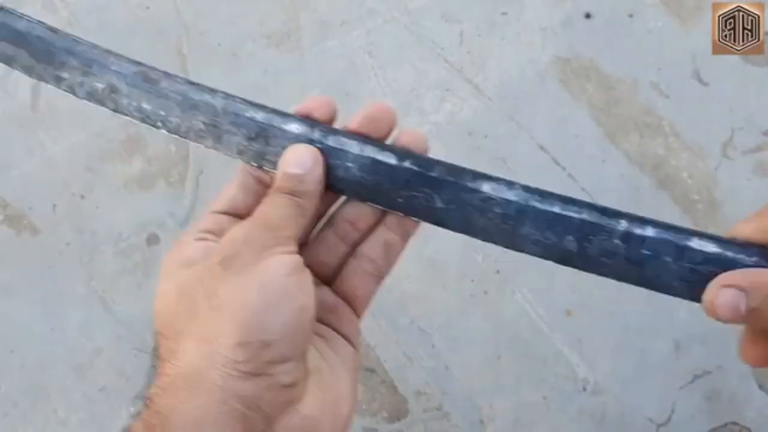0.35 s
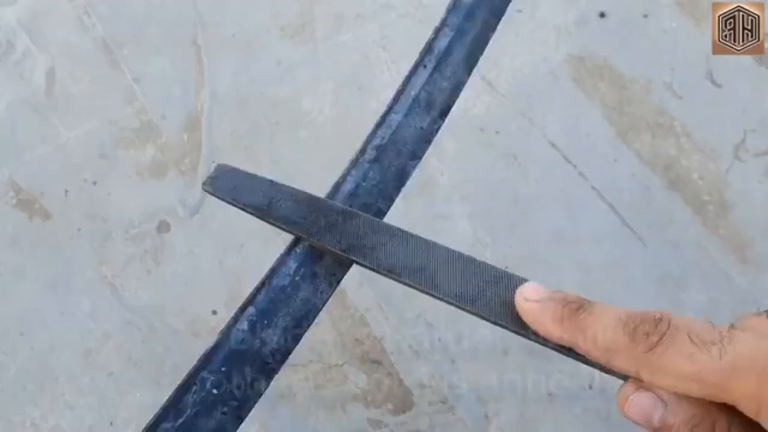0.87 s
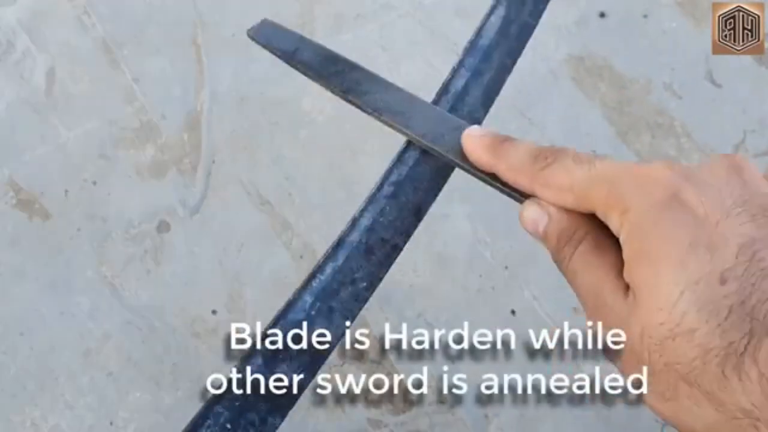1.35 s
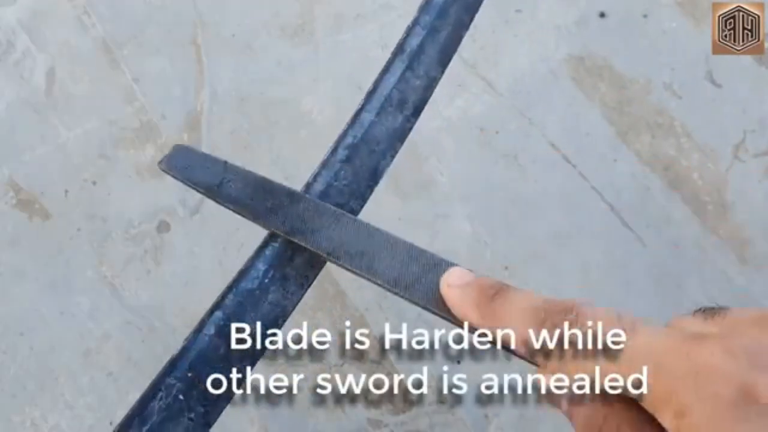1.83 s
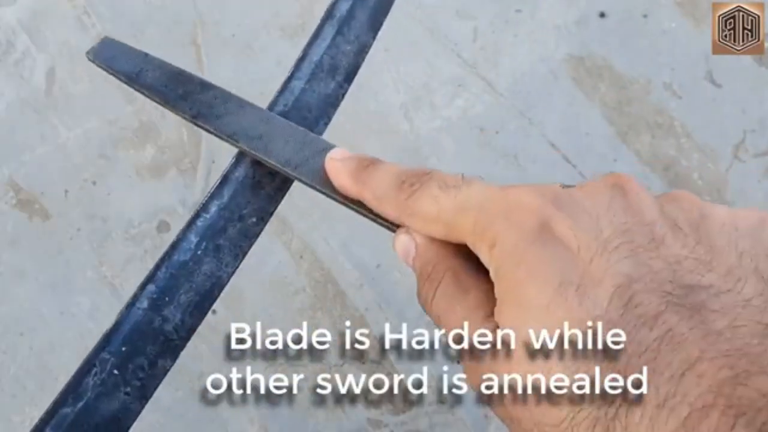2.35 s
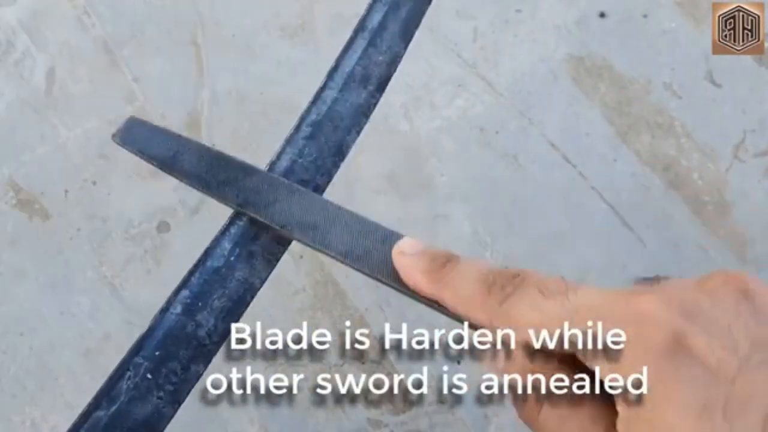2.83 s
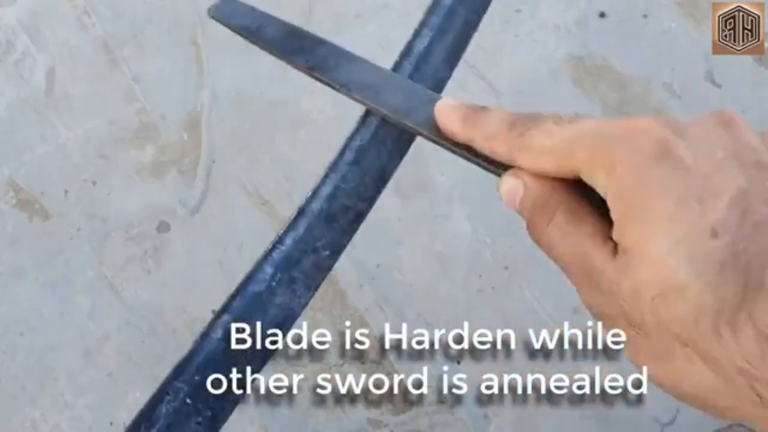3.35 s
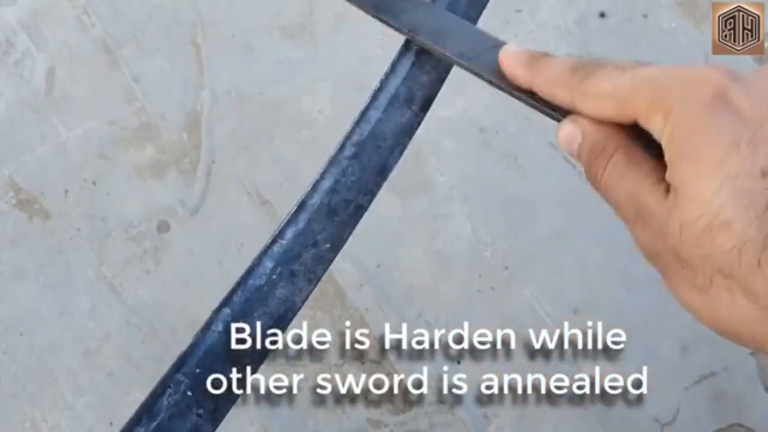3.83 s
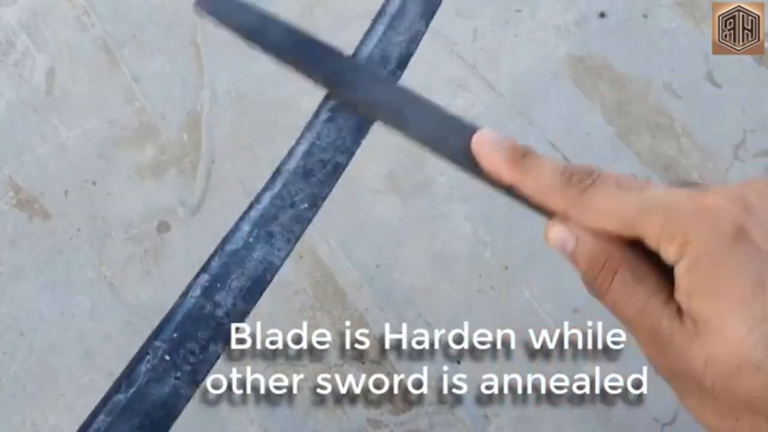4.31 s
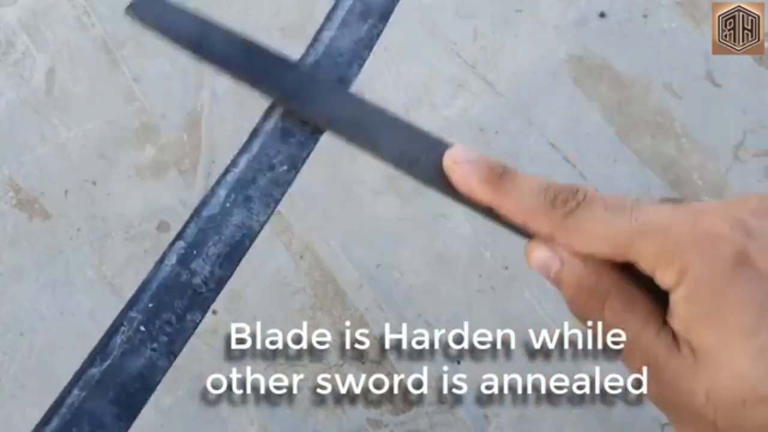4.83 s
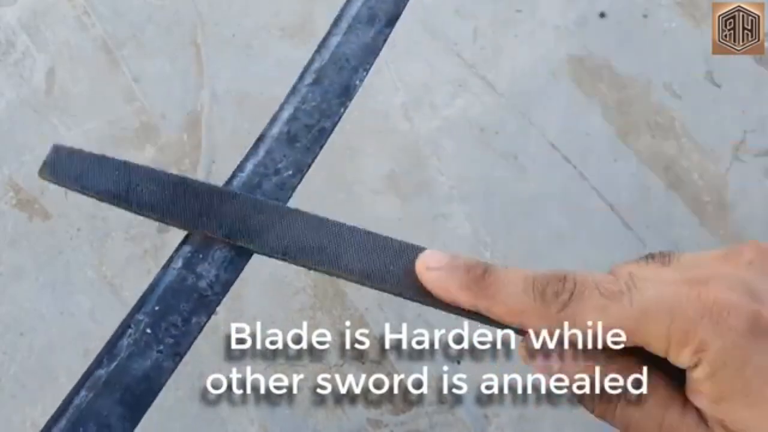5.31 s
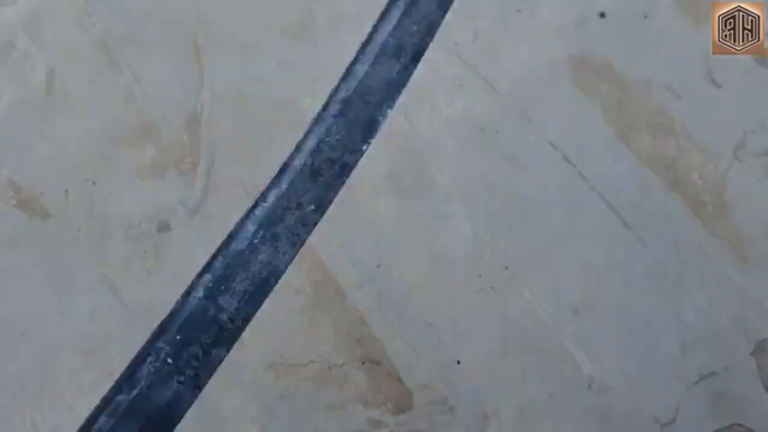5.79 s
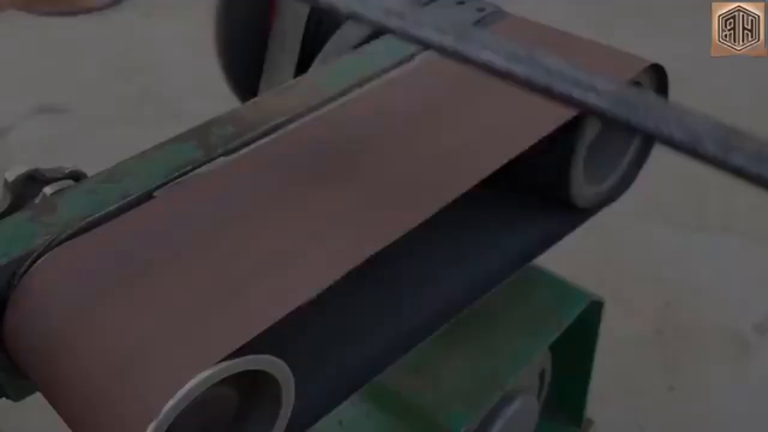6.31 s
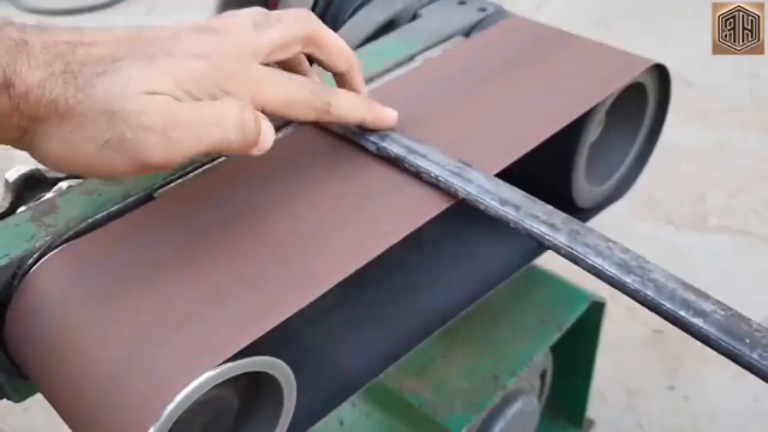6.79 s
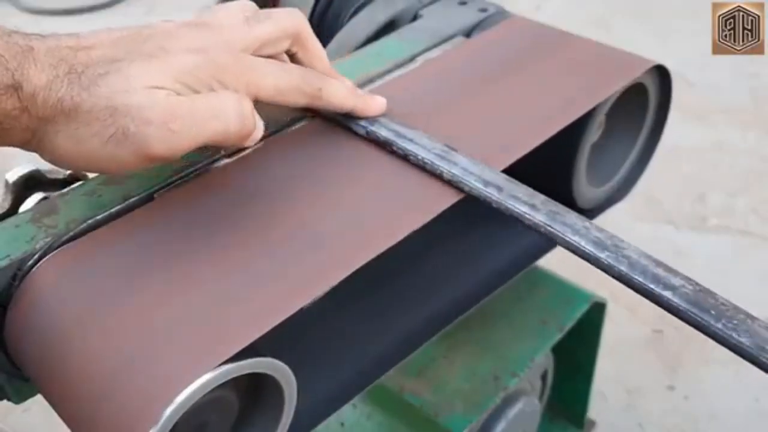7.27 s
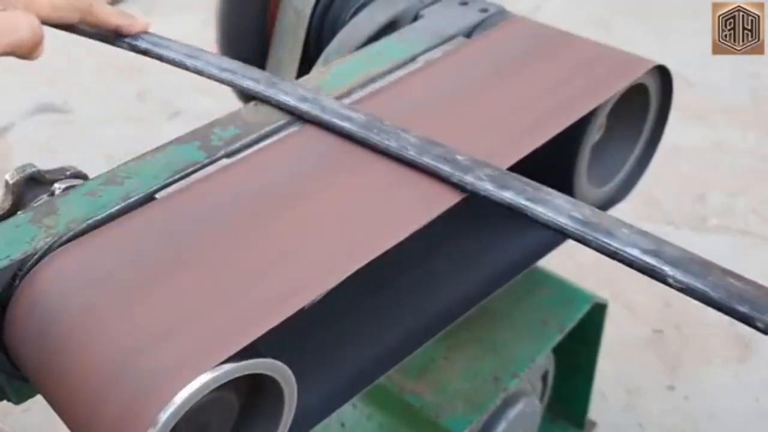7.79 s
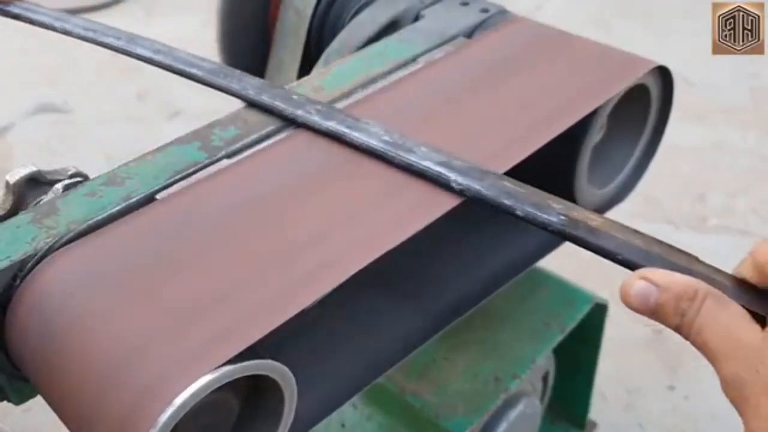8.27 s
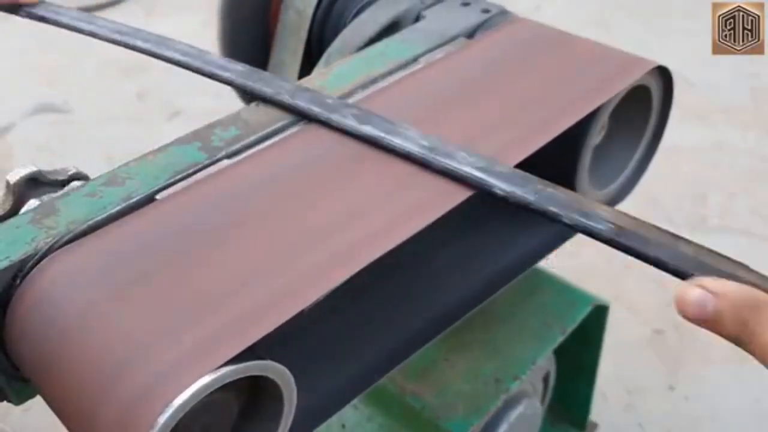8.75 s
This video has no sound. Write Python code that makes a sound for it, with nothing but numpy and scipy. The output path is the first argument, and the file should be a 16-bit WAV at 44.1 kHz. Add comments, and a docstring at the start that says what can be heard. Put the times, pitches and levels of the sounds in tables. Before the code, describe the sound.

A phone close to the work outdoors hears soft wind buffets and distant yard noise. A hand file clicks onto a hardened blade and skates over it in bright, glassy, uneven strokes with quiet gaps. Suddenly a belt grinder replaces the open air, humming and growling alone, then the blade presses on and a strong sandy hiss appears, with steel singing thinly. Treble leans left.

```python
"""Outdoors, a hand file taps a hardened steel blade and skates across it in short strokes, over wind and yard noise.
At about 6.25 s the outdoor sound stops and a belt grinder is heard, running free at first;
then the blade is pressed on its belt, and hisses and sings.
File and blade are noise chopped by teeth and passed through resonances; wind, yard and belt are coloured noise.
A phone with two microphone ports listens; the left port faces the work and hears more treble."""
import sys
import numpy as np
from scipy import signal
from scipy.fft import rfft, irfft
from scipy.io import wavfile
from scipy.ndimage import uniform_filter1d, map_coordinates

SR = 44100
rng = np.random.default_rng(int(sys.argv[2]) if len(sys.argv) > 2 else 0)


def file_out(sig):
    """Save sig as 16-bit WAV at sys.argv[1]."""
    # one column per channel
    cols = np.atleast_2d(sig).T
    # limit, then scale
    lim = np.clip(cols, -1, 1)
    pcm = np.round(lim * 32767).astype(np.int16)
    wavfile.write(sys.argv[1], SR, pcm)


def field_ratio(decibels):
    """Amplitude ratio for a level in dB (20 dB per decade); scalars and array-likes work."""
    return 10 ** (np.asarray(decibels, dtype=float) / 20)


N = 403074
TIME = np.arange(N) / SR

# Levels in the tables are relative: the functions below add their own gains.
# Tone of the yard noise. Each row: pitch in Hz, level in dB per Hz.
YARD_TONE = [(150, -11.5), (220, -9), (450, -14), (700, -12.5), (1360, -27), (2300, -22), (3600, -32),
             (6000, -38)]
# Borders of the yard bands that swell separately, in Hz.
YARD_EDGES_HZ = [150, 280, 500, 800, 1300, 1900, 2800, 7000]
# Loudness of the yard. Each row: time in seconds, level in dB.
YARD_LEVEL = [(0, -62), (.3, -60), (.85, -59.5), (.95, -66), (6.3, -69)]
# Tone of the wind. Each row: pitch in Hz, level in dB per Hz.
WIND_TONE = [(12, -48), (20, -8), (50, 2.5), (86, 2.5), (172, 0), (239, -20.5), (300, -22.5), (390, -51.5),
             (660, -120)]
# Wind at the two ports. Each row: pitch in Hz, left minus right in dB.
WIND_PAN = [(25, 11), (60, 3), (120, 3)]
# Gusts on the ports. Each row: middle in seconds, half length in seconds, peak in dB.
GUSTS = [(0.0, 0.031, -47), (0.38, 0.17, -52.5), (0.717, 0.11, -50.5), (1.803, 0.086, -64),
         (2.14, 0.049, -53), (2.72, 0.17, -62), (3.301, 0.086, -53.5), (3.66, 0.14, -51),
         (4.163, 0.15, -58.5), (6.158, 0.17, -49.5)]
CALM_DB = -64  # wind between gusts
# Tone of the faint hiss. Each row: pitch in Hz, level in dB per Hz.
HISS_TONE = [(1500, -51), (2400, -23.5), (4000, -21.5), (6500, -5), (8000, -4), (13000, -3), (15500, 4)]
# When the faint hiss is heard; the one at 2.723 s is a light drag of the file.
# Each row: start in seconds, length in seconds, level in dB, change in dB.
HISS_TIMES = [(0.0, 0.4, -62, 7.5), (0.496, 0.26, -61.5, 7), (2.27, 0.15, -67.5, -4),
              (2.723, 0.078, -49.5, -24), (3.087, 0.19, -70.5, 4), (3.988, 0.27, -63.5, 6),
              (5.894, 0.31, -60.5, 6)]
SOFT_S = 0.048  # these sounds come and go gently
MACHINE_FROM_S = 6.25  # the outdoor sound ends here

# Loudness of the machine. Each row: time in seconds, level in dB.
MACHINE_LEVEL = [(6.24, -68), (6.26, -33.5), (6.39, -31.5), (6.48, -31), (7.9, -29), (8.01, -29.5),
                 (8.12, -29), (9.14, -25)]
# Tone of the running belt. Each row: pitch in Hz, level in dB per Hz.
BELT_TONE = [(18, -63.5), (30, -27.5), (237, -25), (284, -23), (639, -15.5), (1230, -12.5), (1770, -10.5),
             (3680, -10), (6050, -26), (13300, -32), (15500, -22.5)]
# Resonances of the machine frame. Each row: pitch in Hz, width in Hz before widening, level in dB.
FRAME_MODES = [(223, 3.1, -3), (256, 15.4, -1), (437, 9, -6), (479, 120, -7), (577, 60, -13.5),
               (834.5, 27, 3.5), (2540, 27, -13.5)]
# Ring of the frame. Each row: time in seconds, level in dB.
FRAME_LEVEL = [(6.25, -14), (6.45, -2.5), (6.7, -2), (7.3, -7.5), (7.8, -9), (8.4, -9), (8.6, -16),
               (9.14, -12)]
# Resonances of the growl. Each row: pitch in Hz, width in Hz before widening, level in dB.
GROWL_MODES = [(998, 77, -4.5), (1166, 13, 3), (1208, 16, 6.5), (1248, 10, 4), (1354, 50, -2.5),
               (1360, 120, -18.5)]
# Growl, damped once the blade loads the belt. Each row: time in seconds, level in dB.
GROWL_LEVEL = [(6.25, -4), (6.4, 10), (6.6, 3.5), (6.9, 5.5), (7.05, 2.5), (7.3, -7), (9.14, -11.5)]
# Brief booms of the frame. Each row: middle in seconds, peak in dB.
BOOMS = [(7.64, -43), (7.77, -42.5), (7.88, -38), (8.15, -47.5), (8.28, -43.5), (8.92, -49)]
SHAFT_HZ, BOOM_HALF_S = 23.8, 0.042
# Bounces off the machine, moving with the blade. Each row: time in seconds, delay off the table in ms,
# delay off the platen (plate behind the belt) in ms, share off the platen from 0 to 1.
BOUNCES = [(7.002, 0.85, 0.364, 0.2), (7.5, 0.7, 0.363, 0.21), (7.9, .73, 0.305, 0.2),
           (8.2, 0.67, 0.376, 0.5), (8.55, .63, 0.36, 0.2), (8.85, .6, 0.338, 0.5), (9.05, .65, 0.42, 0.02)]
BLADE_ON_S = 7.05  # bounces are heard from here
# Tone of the belt's hiss. Each row: pitch in Hz, level in dB per Hz.
BELT_HISS_TONE = [(900, -32), (1800, -9), (3500, -3), (5500, 2), (8000, -2), (10500, -9), (13000, -7),
                  (15500, -10)]
# Hiss of the belt, running free at first, then with steel pressed on it.
# Each row: time in seconds, treble in dB, middle against the treble in dB.
BELT_HISS_LEVEL = [(6.24, -79.5, -5), (6.26, -54, -6), (6.42, -47.5, 0), (6.99, -46, -4.5),
                   (7.13, -29, -10.5), (7.62, -33.5, -9), (7.85, -32.5, -6), (8.02, -38, -6),
                   (8.12, -33, -9), (8.74, -28.5, -21.5), (9.04, -33, -4.5), (9.11, -38.5, 11.5),
                   (9.14, -40.5, 12)]
# Resonances of the blade on the belt. Each row: pitch in Hz, width in Hz, level in dB.
BLADE_MODES = [(1855, 95, -3), (3855, 46, 0), (4540, 70, -15), (6460, 110, -3), (7940, 80, -15)]
# When the blade sings. Each row: start in seconds, length in seconds, level in dB, change in dB,
# lowest mode in dB, upper modes in dB.
SONGS = [(7.327, 0.656, -34.5, 2, -39, 0), (8.032, 1.015, -43, 14.5, -5.5, -0.5)]
# Hiss and song at the two ports. Each row: pitch in Hz, left minus right in dB.
GRIND_PAN = [(700, 5), (1300, -9), (2400, 16), (4400, 5.5), (8100, 6.5), (15000, 18)]

# Strokes of the file, and one very short catch at 4.436 s. Each row: fastest moment in seconds,
# speeding up in seconds, slowing down in seconds, level in dB, middle ring in dB, treble in dB.
STROKES_AND_CATCH = [(1.375, 0.089, 0.14, -22, -14, 15.5), (1.96, .04, .042, -36, -12, 16),
                     (2.152, 0.079, 0.061, -23.5, 1.5, 14.5), (2.608, .036, 0.063, -33.5, 5.5, 10),
                     (2.956, .07, 0.1298, -35.5, -9, 12), (3.3, 0.06, 0.1264, -24, -14.5, 14),
                     (3.851, 0.1125, 0.18, -26.5, -1, 12.5), (4.401, 0.075, 0.23, -23, 6, 9),
                     (4.436, 0.0073, 0.01, -26.5, 11.5, 9.5), (4.59, 0.14, 0.057, -29.5, 8, 8.5),
                     (4.954, 0.059, 0.18, -22, 1.5, 11.5), (5.173, 0.19, .075, -26, 10, 5),
                     (5.542, 0.085, .05, -23.5, 5, 9), (5.595, 0.048, 0.041, -37.5, 0, 8),
                     (5.785, .055, 0.11, -19, -0.5, 13)]
RISE_POWER, FALL_POWER = 1.83, 3.4  # level grows as speed to this power
# Light drags. Each row: start in seconds, length in seconds, level in dB, change along the drag in dB,
# middle ring in dB, treble in dB.
DRAGS = [(0.951, 0.056, -45, -5.5, -1, 7), (1.854, .08, -45, -9.5, -15, 3),
         (2.703, 0.065, -60, -0.5, 7, -5), (2.807, 0.063, -41, -10, 0.5, 2), (3.432, .06, -53, -5, 1, 5.5),
         (3.526, 0.052, -46.5, -4, -1, 3), (3.609, .15, -49, 0.5, -22, -9.5),
         (4.176, 0.14, -64.5, 21, -12, -22), (4.843, 0.051, -42, -6.5, -8, -12.5),
         (5.428, 0.054, -46.5, 7.5, 5, 1.5), (5.689, 0.023, -61, -1.5, 2.5, 3.5)]
DRAG_ATTACK_S = 0.0041
LET_GO_DB_PER_S = 602  # fall at the end of drags, hisses and songs
# File lands on the blade. Each row: time in seconds, force in dB, middle ring in dB.
TAPS = [(0.9427, -14.5, 6), (1.2544, -42, -16), (1.33, -30.5, -4.5), (1.846, -28.5, -4), (1.946, -23.5, -4),
        (2.0883, -23, 0.5), (2.154, -21, -4.5), (2.5882, -22, 4), (2.807, -27.5, -3), (3.488, -29.5, -8),
        (3.5207, -19.5, 12), (3.5385, -26, 4), (3.5487, -28, 2), (3.5615, -20, 1), (3.5964, -21.5, -5),
        (3.637, -27, -6), (3.7195, -29.5, -4), (3.770, -16.5, -7), (4.243, -20, 13.5), (4.8468, -12, 8),
        (4.889, -30, -5), (5.4218, -7, -10)]
CLICK_GROWTH, CLICK_DB = 1.4, 4  # soft landings hardly click
RATTLE_DB, RATTLE_S = -15.5, 0.005
TAP_TREBLE_DB, TAP_BASS_DB = 8.5, 11.5  # a landing knocks deeper than a scrape
TOOTH_HZ, TOOTH_GATE = 924.4, 0.5  # teeth passing at full speed; how far they chop the scrape
# Buzz of the teeth, lost once the file skates. Each row: time in seconds, level in dB.
TOOTH_LEVEL = [(1.5, -3), (2.0, -14), (2.15, -5), (2.5, -14), (3.3, -13), (3.6, -26)]
TAIL_DB, TAIL_S = -24.5, 0.033  # the steel hums on after each stroke
# Broad tone of the scrape. Each row: pitch in Hz, level in dB per Hz.
SCRAPE_TONE = [(300, -32.5), (520, -13.5), (900, -3), (1500, 0), (2800, 9.5), (4300, 5), (7000, 0),
               (12000, -8.5), (15000, -6.5)]
# File and blade ring together. Each row: pitch in Hz, width in Hz before widening, level in dB.
FILE_MODES = [(2420, 80, -5), (2530, 80, -4), (2810, 77, -7), (3260, 90, -1), (3460, 70, 0), (3620, 80, -2),
              (4510, 65, -5), (5140, 90, -2), (5900, 80, -4), (6560, 70, -4), (7380, 80, -6),
              (7900, 55, -6), (8950, 70, -6), (9950, 60, -6), (10800, 90, -11), (11800, 100, -12),
              (12750, 100, -12), (13700, 110, -12), (14750, 120, -14)]
# Bass against the low ring; later strokes are thinner. Each row: time in seconds, level in dB.
BASS_LEVEL = [(1.0, -13.5), (1.4, -15), (2.15, -8), (3.3, -6.5), (3.8, -16), (4.4, -15), (5.8, -18)]
BASS_PER_FORCE = 0.37  # dB per dB: firm pressure brings out the bass
LOW_DB, LOW_PER_FORCE = -8, 0.026  # band under the low ring, fuller with pressure
SLIDE_MS = 0.3  # the modes drift in pitch as the contact slides along
# File at the two ports. Each row: pitch in Hz, left minus right in dB.
FILE_PAN = [(700, -4), (1300, 4), (2400, 3.5), (4400, 3), (8100, 10), (15000, 1)]
FILE_LEAN_DB = -0.5  # left minus right, at all pitches
TOP_HZ = 15050  # the phone's upper limit


def unit(x):
    """Scale to an average strength (rms) of 1."""
    return x / np.sqrt(np.mean(x ** 2))


def curve(rows):
    """Read a two-column table at every sample, holding its end values."""
    return np.interp(TIME, *np.transpose(rows))


def curves(rows, outside=-120):
    """Columns of a table at every sample; practically silent outside its span."""
    s, *columns = np.transpose(rows)
    return [np.interp(TIME, s, c, outside, outside) for c in columns]


def walk(rate):
    """Random levels held 1 / rate s and slewed; spread near 1."""
    k = max(int(SR / rate), 1)
    steps = np.repeat(rng.standard_normal(N // k + 1), k)[:N]
    return 1.2 * uniform_filter1d(steps, k)


def held(start, length, db, change_db):
    """Gain that sets in at once, drifts by change_db and then lets go."""
    t = TIME - start
    drift_db = change_db * np.clip(t / length, 0, 1)
    return (t > 0) * field_ratio(db + drift_db - LET_GO_DB_PER_S * np.clip(t - length, 0, 1))


def bumps(rows):
    """Add up bell-shaped swells, each given as middle, half length and peak dB."""
    return sum(field_ratio(db) * np.exp(-((TIME - s) / half) ** 2) for s, half, db in rows)


def colour(x, points):
    """Shape the tone through (Hz, dB) points without sounding early, by folding the cepstrum."""
    hz, db = np.transpose(points)
    grid_hz = np.linspace(1, SR / 2, num=2049)
    cep = irfft(np.interp(np.log(grid_hz), np.log(hz), db) * np.log(10) / 20)
    cep[1:2048] *= 2
    cep[2049:] = 0
    return signal.oaconvolve(x, irfft(np.exp(rfft(cep)))[None], axes=1)[:, :N]


def band(x, lo_hz, hi_hz):
    """Band-pass without phase shift, so that neighbouring bands join smoothly."""
    return signal.sosfiltfilt(signal.butter(2, [lo_hz, hi_hz], "band", fs=SR, output="sos"), x)


def delay(x, ms):
    """Read each channel at a moving, interpolated lag."""
    place = np.arange(N) - ms * SR / 1000
    return np.array([map_coordinates(v, [place], order=3) for v in x])


def ports(alike_hz):
    """Noise for two ports: alike well below alike_hz, unrelated well above."""
    left, other = rng.standard_normal((2, N))
    low, high = (signal.butter(1, alike_hz, kind, fs=SR) for kind in ("low", "high"))
    return np.array([left, signal.lfilter(*low, left) + signal.lfilter(*high, other)])


def lean(x, pan):
    """Share each band's left-minus-right difference evenly between the two ports."""
    left = colour(x[:1], [(hz, db / 2) for hz, db in pan])
    right = colour(x[1:], [(hz, -db / 2) for hz, db in pan])
    return np.vstack([left, right])


def ring(x, modes, widen, waver_db, rate):
    """Add resonances; each swells and fades, partly differently at each port."""
    total = 0
    for hz, width, db in modes:
        waver = 1.09 * walk(rate) + 0.63 * np.array([walk(rate), walk(rate)])
        tone = signal.lfilter(*signal.iirpeak(hz, hz / (widen * width), SR), x)
        total = total + field_ratio(db + waver_db * waver) * tone
    return total


def yard():
    """Distant yard noise; each band swells on its own."""
    noise = unit(colour(ports(350), YARD_TONE))
    bands = sum(band(noise, lo, hi) * field_ratio(4.3 * walk(7)) for lo, hi in zip(YARD_EDGES_HZ, YARD_EDGES_HZ[1:]))
    return bands * field_ratio(curve(YARD_LEVEL))


def wind():
    """Gusts buffet the ports as deep noise, stronger at the left one."""
    gusts = (field_ratio(CALM_DB) + bumps(GUSTS)) * field_ratio(3.0 * walk(12))
    noise = ports(51)[::-1] + 0.9 * ports(900)
    return lean(unit(colour(noise, WIND_TONE)), WIND_PAN) * gusts


def faint_hiss_and_drag():
    """Wavering high noise, stronger at the left port, makes the faint hiss and one light drag of the file."""
    hiss = unit(colour(ports(1500), HISS_TONE)) * field_ratio(3.3 * walk(6.5)) * field_ratio(np.array([[3.5], [-3.0]]))
    return hiss * uniform_filter1d(sum(held(*row) for row in HISS_TIMES), int(SOFT_S * SR))


def outdoors():
    """Wind, yard noise, faint hiss and one light drag are added up and stop where the machine comes in."""
    return (wind() + yard() + faint_hiss_and_drag()) * (TIME < MACHINE_FROM_S)


def running_machine(shake):
    """Belt and bearings shake the frame, which hums and growls on its resonances."""
    belt = unit(colour(shake, BELT_TONE))
    hum = unit(ring(shake, FRAME_MODES, widen=0.95, waver_db=2.1, rate=12))
    growl = unit(ring(shake, GROWL_MODES, widen=1.38, waver_db=1.7, rate=24))
    growl_db = curve(GROWL_LEVEL) + 1.8 * walk(48)
    return belt + field_ratio(curve(FRAME_LEVEL)) * hum + field_ratio(growl_db) * growl


def frame_booms(shake):
    """The frame booms briefly, as swells of the shaking in one low band."""
    swells = bumps([(s, BOOM_HALF_S, db) for s, db in BOOMS])
    return swells * unit(band(shake, 393, 580))


def belt_hiss(rough, table_ms, platen_ms, share):
    """The belt hisses, free at first, then on the steel, where two bounces with moving delays comb the hiss."""
    table = [[0.3], [0.15]] * (TIME > BLADE_ON_S) * band(delay(rough, table_ms), 7000, 19000)
    hiss = colour(rough - share * delay(rough, platen_ms) + table, BELT_HISS_TONE)
    treble_db, middle_db = curves(BELT_HISS_LEVEL)
    treble = unit(band(hiss, 9600, 15340))
    middle = unit(band(hiss, 1700, 9600))
    return field_ratio(treble_db) * (treble + field_ratio(middle_db + 7.5) * middle)


def blade_song(rough):
    """Rough noise excites a few resonances of the blade, which sings with a drifting pitch."""
    song = delay(ring(rough, BLADE_MODES, widen=1.0, waver_db=1.9, rate=22), SLIDE_MS * walk(9))
    low, middle, high = (band(song, *edge) for edge in [(1200, 2800), (2800, 5500), (5500, 10000)])
    sung = sum(held(*row) * (field_ratio(low_db) * low + middle + field_ratio(high_db) * high)
               for *row, low_db, high_db in SONGS)
    return sung / np.std(song)


def grinder():
    """Machine, belt hiss and song throb once a shaft turn; bounces thin out some pitches once the blade is on."""
    throb = field_ratio(0.21 * np.sin(2 * np.pi * SHAFT_HZ * TIME + 0.46 * walk(3.3)))
    shake = ports(1500) * throb * field_ratio(1.2 * walk(150))
    rough = ports(900) * throb * field_ratio(1.5 * walk(400) + 0.6 * walk(25))
    s, *columns = np.transpose(BOUNCES)
    table_ms, platen_ms, share = (np.interp(TIME, s, c) for c in columns)
    platen_ms = platen_ms + 0.019 * walk(6)
    share = np.clip(share, 0, 1) * (TIME > BLADE_ON_S)
    machine = running_machine(shake)
    machine = machine - share * band(delay(machine, platen_ms), 1400, 12000)
    machine_db, = curves(MACHINE_LEVEL)
    hiss_and_song = belt_hiss(rough, table_ms, platen_ms, share) + field_ratio(4.5) * blade_song(rough)
    return field_ratio(machine_db - 6.5) * machine + frame_booms(shake) + lean(hiss_and_song, GRIND_PAN)


def speed(s, rise, fall):
    """Hand speed 0-1 before and after the fastest moment, along a quarter sine each."""
    ramp = lambda t: np.sin(np.pi / 2 * np.clip(t, 0, 1))
    return ramp(1 + (TIME - s) / rise), ramp(1 - (TIME - s) / fall)


def filing():
    """The hand speeds up and slows down in each stroke; teeth catch unevenly; the short catch is shaped alike."""
    moves = [speed(*row[:3]) for row in STROKES_AND_CATCH]
    strokes = sum(field_ratio(row[3]) * up ** RISE_POWER * down ** FALL_POWER
                  for row, (up, down) in zip(STROKES_AND_CATCH, moves))
    # this average looks back, so that drags build up after their start
    drags = uniform_filter1d(sum(held(*row[:4]) for row in DRAGS), int(DRAG_ATTACK_S * SR),
                             origin=int(DRAG_ATTACK_S * SR / 2) - 1)
    chatter_db = 1.6 * walk(500) + 1.6 * walk(70)
    pace = np.max([up * down for up, down in moves], axis=0)
    return (strokes + drags) * field_ratio(chatter_db), pace


def taps():
    """Each landing builds within about a ms, dies at once and rattles a little longer."""
    total = np.zeros(N)
    for s, db, _ in TAPS:
        t = np.clip(TIME - s, 0, None)
        fading = np.exp(-t / 0.0011) + field_ratio(RATTLE_DB) * np.exp(-t / RATTLE_S)
        total += field_ratio(db) * (1 - np.exp(-t / 0.0042)) * fading
    return total


def clicks():
    """The hard touch of each landing, as a single spike 1 ms in."""
    out = np.zeros(N)
    s, db, _ = np.transpose(TAPS)
    out[((s + 0.001) * SR).astype(int)] = field_ratio(CLICK_GROWTH * db + CLICK_DB)
    return out


def teeth(pace):
    """Phase of the teeth crossing the edge; faster strokes buzz higher."""
    tooth_hz = TOOTH_HZ * (0.3 + 0.7 * pace) * (1 + 0.045 * walk(120))
    return 2 * np.pi * np.cumsum(tooth_hz) / SR


def band_shares(landing, force_db):
    """Balance of bass, low, low ring, middle ring and treble as the file rubs and lands."""
    rows = [(r[0], *r[4:]) for r in STROKES_AND_CATCH] + [(r[0] + r[1] / 2, *r[4:]) for r in DRAGS]
    s, rub_ring, rub_treble = np.transpose(sorted(rows))
    tap_s, _, tap_ring = np.transpose(TAPS)
    ring_db = np.interp(TIME, s, rub_ring) * (1 - landing) + np.interp(TIME, tap_s, tap_ring) * landing
    treble_db = np.interp(TIME, s, rub_treble) * (1 - landing) + TAP_TREBLE_DB * landing
    bass_db = curve(BASS_LEVEL) + BASS_PER_FORCE * force_db + TAP_BASS_DB * landing
    low_db = LOW_DB + LOW_PER_FORCE * force_db
    shares = field_ratio(np.array([bass_db, low_db, 0 * TIME, ring_db, treble_db]))
    return shares / np.sqrt(np.sum(shares ** 2, axis=0))


def steel(push, knock, landing, force_db):
    """Rubbing and knocks give a broad scrape and set the resonances of file and blade ringing."""
    scrape = unit(colour(push + knock, SCRAPE_TONE))
    # the rings waver as the contact point moves
    rubbed = delay(ring(push, FILE_MODES, widen=0.9, waver_db=3.8, rate=28), SLIDE_MS * walk(9))
    knocked = ring(knock, FILE_MODES, widen=1.5, waver_db=1.5, rate=6)
    body = scrape * field_ratio(-4.5) + unit(rubbed + field_ratio(5.0) * knocked)
    edges = [(420, 1300), (1300, 2150), (2150, 2950), (2950, 4300), (4300, 19000)]  # Hz
    shares = band_shares(landing, force_db)
    parts = sum(unit(band(body, *edge)) * share for edge, share in zip(edges, shares))
    return lean(parts, FILE_PAN) * field_ratio(np.array([[FILE_LEAN_DB], [-FILE_LEAN_DB]]) / 2)


def file_on_blade():
    """Rubbing chopped by the teeth, and landings, make the rough force that drives the steel."""
    (rub, pace), blow = filing(), taps()
    phase = teeth(pace)
    keep = np.exp(-1 / (TAIL_S * SR))
    rub = rub + field_ratio(TAIL_DB) * signal.lfilter([1 - keep], [1, -keep], rub)
    buzz_level = field_ratio(curve(TOOTH_LEVEL) + 5.6 * walk(50)) * rub * pace ** 3
    buzz = buzz_level * (np.cos(phase) + 0.5 * np.cos(2 * phase))
    push = (rub * (1 + TOOTH_GATE * pace * np.cos(phase)) + blow) * ports(3500) + buzz
    landing = uniform_filter1d(blow / (rub + blow + 1e-6), 300)  # 0 rubbing, 1 landing
    force_db = 20 * np.log10(uniform_filter1d(rub + blow, 400) / field_ratio(-27) + 1e-3)
    return steel(push, clicks(), landing, force_db) * np.sqrt(np.mean(push ** 2))


def scene():
    """Filing in the open air, then the grinder."""
    return outdoors() + grinder() + file_on_blade()


def roll_off(x):
    """The treble ends steeply here."""
    return signal.sosfilt(signal.butter(12, 16330, fs=SR, output="sos"), x)


def record(dry):
    """The phone cuts the top steeply."""
    top_cut = signal.ellip(10, 0.2, 60, TOP_HZ, fs=SR, output="sos")
    mix = signal.sosfilt(top_cut, dry)
    return roll_off(mix)


dry = scene()
out = record(dry)
file_out(out)
```